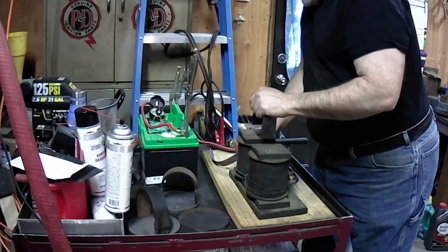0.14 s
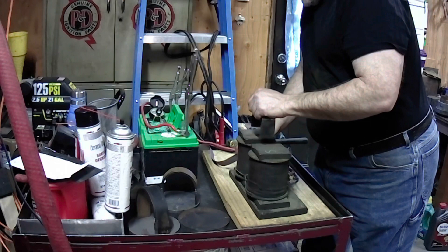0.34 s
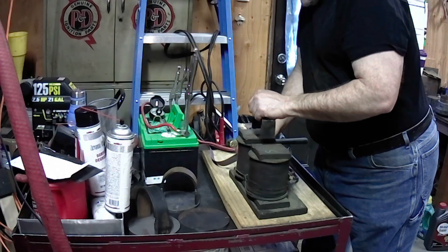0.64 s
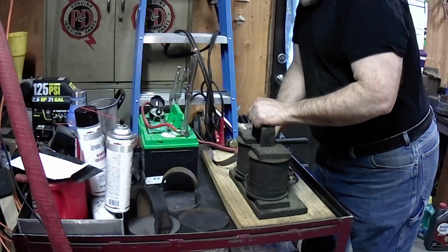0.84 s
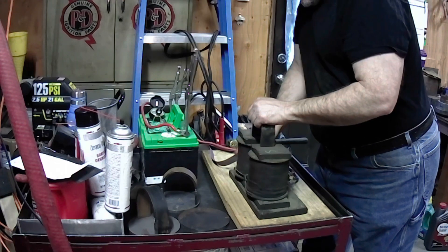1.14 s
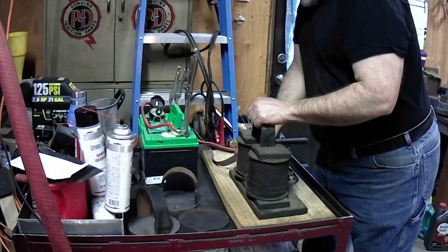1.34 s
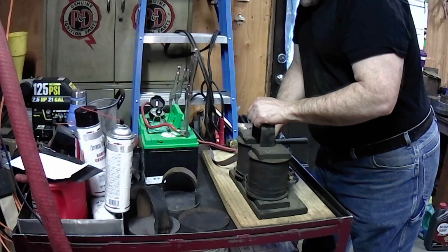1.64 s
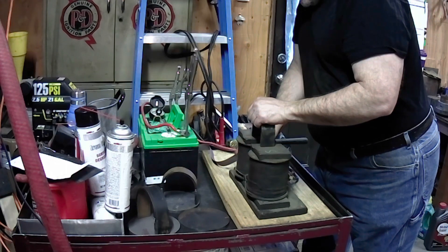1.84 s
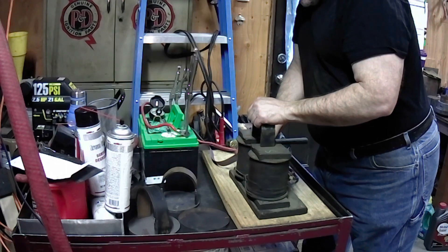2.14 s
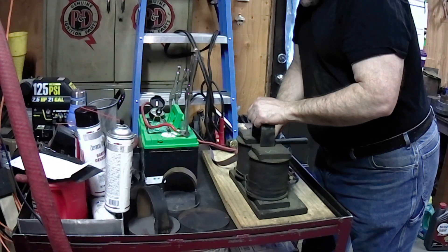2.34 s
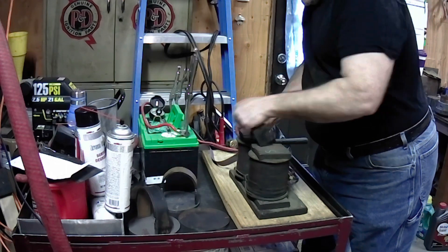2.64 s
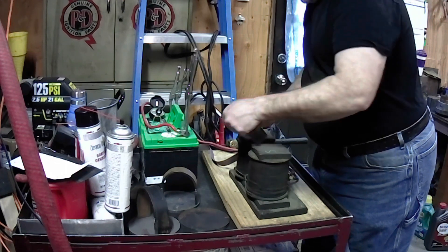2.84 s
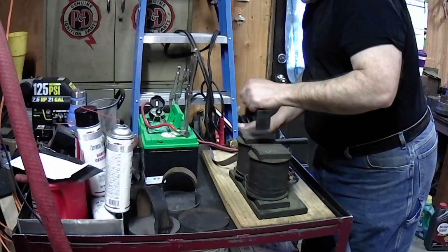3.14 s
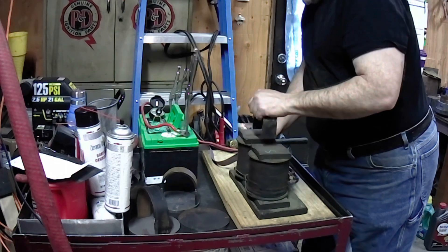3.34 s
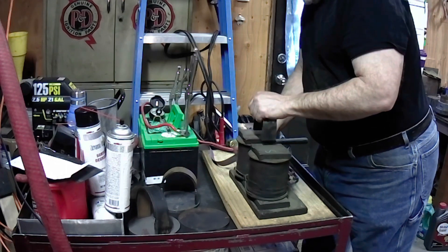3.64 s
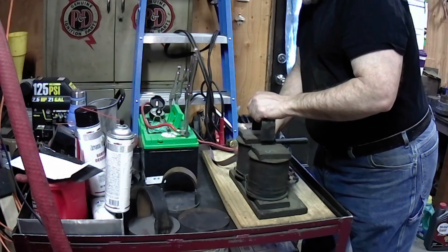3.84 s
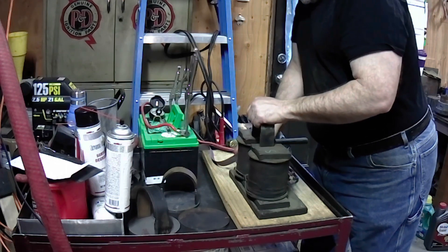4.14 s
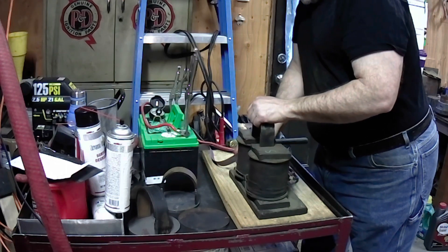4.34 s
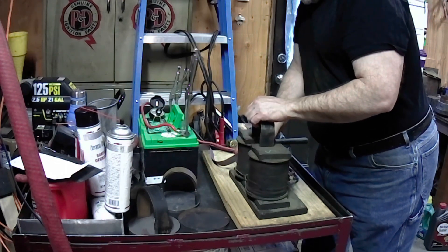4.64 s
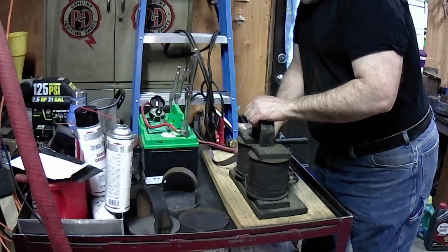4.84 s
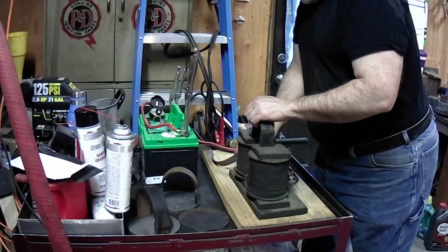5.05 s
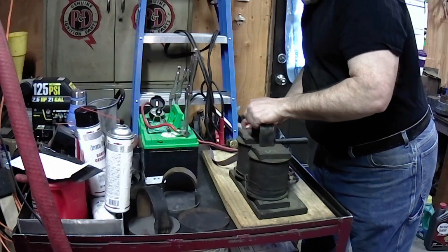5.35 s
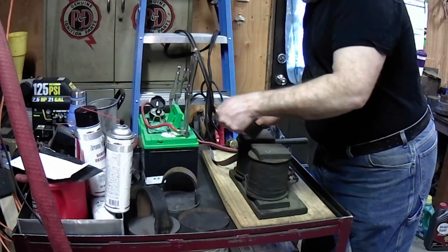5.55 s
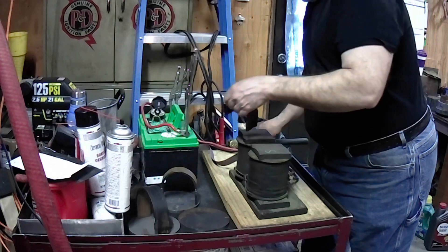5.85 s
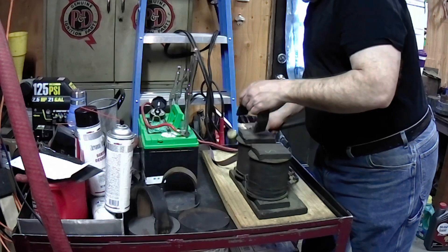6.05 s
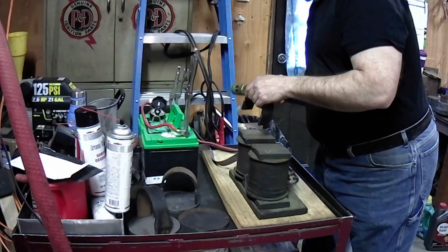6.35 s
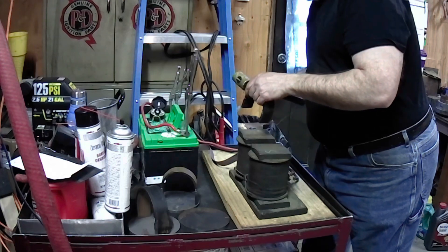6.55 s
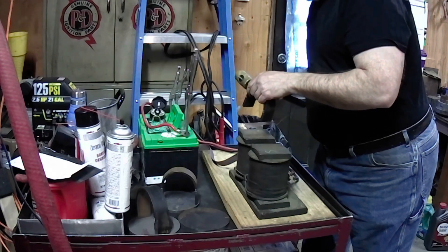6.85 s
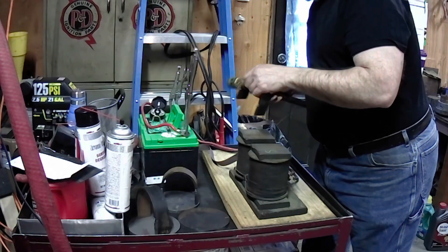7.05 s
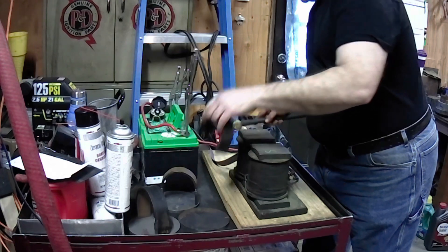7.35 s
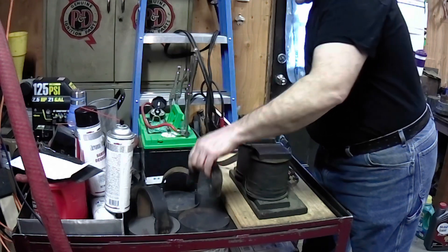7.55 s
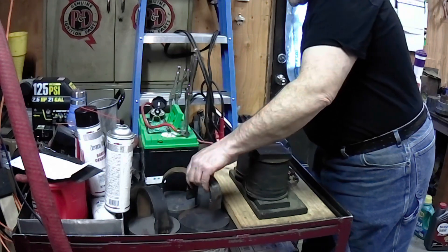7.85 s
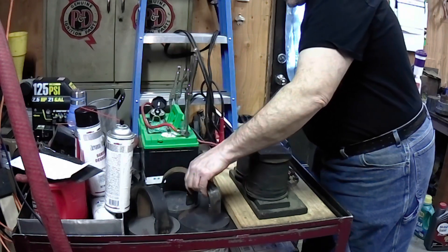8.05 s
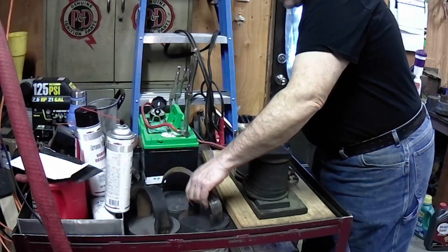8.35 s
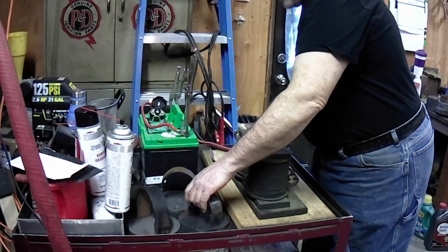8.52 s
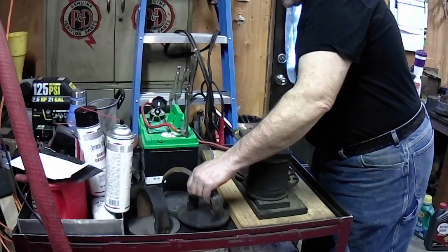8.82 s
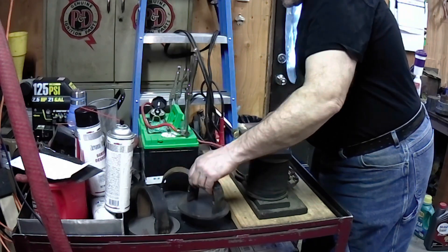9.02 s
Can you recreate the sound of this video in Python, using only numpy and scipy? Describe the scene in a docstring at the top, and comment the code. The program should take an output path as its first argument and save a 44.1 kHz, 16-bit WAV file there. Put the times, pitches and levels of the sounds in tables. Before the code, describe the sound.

In a hard-walled garage, a magnet touches iron poles with light ticks, then snaps home in a very loud, dry clack. It is dragged off with a short scrape and knock, and the snap repeats. After dull cart rattles, a free magnet gives one clear ringing clink; finally one lands on a steel tray with a hard clatter. A small thin microphone hisses and overloads.

```python
"""Horseshoe magnets on iron poles

On a steel cart in a garage, magnets are set on, snap onto and are dragged off a charger's iron poles.
Blows are rattle bursts and damped modes of what is struck, plus the cart; drags are dense clicks.
A magnet held free rings long, another is dropped on the tray; bare walls answer for about half a second.
The small camera microphone has little bass, hisses, clips at full scale and cuts the top.
"""
import sys
import numpy as np
from scipy import signal
from scipy.fft import rfft, irfft
from scipy.io import wavfile
from scipy.ndimage import uniform_filter1d

SR = 44100
rng = np.random.default_rng(int(sys.argv[2]) if len(sys.argv) > 2 else 0)


def digitize_waveform(pressure):
    """Quantize a signal to 16-bit integers and store it at the path in sys.argv[1].

    Rows of a 2-D input are taken as channels; values are limited to [-1, 1].
    """
    field = np.atleast_2d(pressure).T
    bounded = np.clip(field, -1, 1)
    quanta = np.round(bounded * 32767).astype(np.int16)
    wavfile.write(sys.argv[1], SR, quanta)


N = 404838  # samples

# how a body answers: (modes per listed pitch, relative spread of their pitch)
DENSE, PLAIN, CLEAR = (6, 0.02), (1, 0.005), (1, 0)


# magnets snapping home: start_s, level_db
SNAP_TIMES = [(1.024, -5.5), (4.32, -4)]
# magnet clamped to the poles: pitch_hz, level_db, t60_s
CLAMPED_MODES = [(856, 1, 0.021), (1103, -5.5, 0.036), (1670, -13.5, 0.022), (2089, -5, 0.055),
                 (2970, -9.5, 0.034), (3361, -11.5, 0.032), (3940, -6.5, .025), (4096, -1, .035),
                 (4090, -0.5, 0.055), (4600, -1, 0.038), (5510, -15.5, 0.025), (6246, -14.5, 0.084),
                 (7730, -16, 0.02), (8330, -16, 0.09), (10464, -22, 0.052)]


def snaps():
    """Pulled home by its own force, the magnet and poles ring briefly as one loaded casting."""
    return blows(SNAP_TIMES, CLAMPED_MODES, DENSE, rattle_db=-1.0, rattle_s=0.021, rise_s=0.0061,
                 soft_hz=3000, treble_db=0.6, cart_db=-13, size=SR // 4)


# magnets touching the poles: start_s, level_db
KNOCK_TIMES = [(0.905, -37.5), (0.933, -34), (0.979, -42.5), (2.608, -53), (2.646, -42.5), (2.691, -25.5),
               (2.811, -46.5), (3.012, -46.5), (3.044, -43.5), (4.224, -39.5), (4.241, -32.5),
               (5.344, -39.5), (5.368, -31.5), (5.382, -25.5), (5.593, -52)]
# iron poles: pitch_hz, level_db, t60_s
POLE_MODES = [(636, -4, 0.044), (800, -0.5, 0.042), (1055, 0, 0.035), (1270, -1, 0.017), (1616, 3.5, 0.021),
              (2288, 0, .014), (2420, -5, .012), (2760, -9.5, 0.016), (4030, -16, 0.023), (4400, -18, .014),
              (5300, -20, .012)]


def knocks():
    """Softer contacts ring the heavy poles for a few hundredths of a second."""
    return blows(KNOCK_TIMES, POLE_MODES, DENSE, rattle_db=-2.0, rattle_s=0.041, rise_s=0.03,
                 soft_hz=2670, treble_db=-10.5, cart_db=-12, harder=-0.05, shakier=0.2, size=SR // 4)


# magnets half off the poles: start_s, level_db
LIFT_TIMES = [(0.003, -45.5), (0.018, -36.5), (3.094, -47.5), (3.101, -36.5), (5.714, -40), (5.731, -42.5)]
# half-lifted magnet: pitch_hz, level_db, t60_s
LIFTING_MODES = [(628, -6.5, 0.068), (743, -15, 0.1), (967, 0.5, 0.032), (1040, -31, 0.083),
                 (1143, -4.5, 0.035), (1490, -8, 0.045), (1810, -19.5, 0.029), (2830, -17.5, 0.075),
                 (3420, -21, 0.18), (3900, -11, 0.083), (4615, -7.5, 0.048)]


def lifts():
    """A half-lifted magnet is only partly damped by the iron."""
    return blows(LIFT_TIMES, LIFTING_MODES, PLAIN, rattle_db=-6.5, rattle_s=0.027, rise_s=0.0048,
                 soft_hz=2130, treble_db=-16, cart_db=-10.5, size=SR // 3)


# blows on a magnet held free: start_s, level_db
CLINK_TIMES = [(.018, -59.5), (3.1, -60.5), (6.918, -13)]
# free magnet: pitch_hz, level_db, t60_s
FREE_MODES = [(646, -22.5, 1.9), (1860, -20, 0.17), (1792, -22, 0.051), (3419, -20.5, 0.36),
              (3740, -16, 0.139), (3957, -7.5, 0.29), (3934, -3.5, 0.1), (4060, -20.5, 0.17),
              (5370, -21.5, 0.085), (6928, -13.5, 0.13), (6935, -11.5, 0.011), (8000, -38, 0.15),
              (10280, -27.5, 0.062), (10700, -30, 0.053)]


def clinks():
    """With nothing to damp it, a free magnet rings long and clear."""
    return blows(CLINK_TIMES, FREE_MODES, CLEAR, rattle_db=-15.5, rattle_s=0.014, rise_s=0.0031,
                 soft_hz=998, treble_db=-7.5, cart_db=-40.5, harder=0.94, size=SR * 2)


# loose iron touched as a magnet tears free: start_s, level_db
PING_TIMES = [(5.384, -60)]
# loose iron piece: pitch_hz, level_db, t60_s
LOOSE_MODES = [(2068, 0, 1), (2370, -6, 0.45)]


def pings():
    """A loose iron piece pings faintly on two clear modes."""
    return blows(PING_TIMES, LOOSE_MODES, CLEAR, rattle_db=-21, rattle_s=0.02, rise_s=0.0092,
                 soft_hz=4000, treble_db=0, cart_db=-40, size=SR)


# magnet landing on the tray: start_s, level_db
DROP_TIMES = [(8.594, -9), (8.946, -50.5)]
# tray: pitch_hz, level_db, t60_s
TRAY_MODES = [(1070, -10, 0.012), (1334, -4.5, 0.0087), (1620, -10.5, 0.011), (2040, -3, 0.031),
              (3010, 10, 0.0093), (4000, -9, .008), (4700, -5, .008), (6000, -21.5, .008),
              (7600, -17, .008)]


def drops():
    """Rattle outweighs the short modes of the struck tray."""
    return blows(DROP_TIMES, TRAY_MODES, DENSE, rattle_db=16.5, rattle_s=0.042, rise_s=0.0087,
                 soft_hz=2930, treble_db=-1.2, cart_db=-2, shakier=0.21, size=SR // 4)


# jolts of the cart's wheels: start_s, level_db
JOLT_TIMES = [(6.03, -51.5), (6.107, -47.5), (6.128, -37), (6.152, -30), (6.169, -31.5), (6.18, -30.5),
              (6.193, -27.5), (6.217, -42.5), (8.598, -19.5)]
# wheels: pitch_hz, level_db, t60_s
WHEEL_MODES = [(202.5, -5, 0.089), (268, -4, 0.049), (365, 3.5, 0.025), (518, -14.5, 0.086),
               (668, -8, 0.038), (1576, -8.5, 0.024), (2120, -10, 0.015), (2340, -5, 0.018),
               (3480, 7, 0.0042)]


def jolts():
    """Each jolt rings the wheels low and dull."""
    return blows(JOLT_TIMES, WHEEL_MODES, DENSE, rattle_db=-5.5, rattle_s=0.046, rise_s=0.012,
                 soft_hz=1570, treble_db=-9.5, cart_db=-12, harder=0.27, size=SR // 4)


# steel cart under everything: pitch_hz, level_db, t60_s
CART_MODES = [(267, -7.5, 0.064), (340, -12, 0.093), (418, 1, 0.077), (565, 0, 0.065), (770.6, -6, 0.14)]
# short rattle of the meeting faces: pitch_hz, level_db (per Hz)
RATTLE_SPECTRUM = [(60, -32), (200, -20), (500, 1.5), (1000, -0.5), (2500, -2.5), (5000, -4.5), (9000, -20),
                   (14000, -34.5)]
FIRM_DB = -30  # level of a firm blow


def blows(events, modes, kind, rattle_db, rattle_s, rise_s, soft_hz, treble_db, cart_db, size,
          harder=0, shakier=0):
    """A blow excites modes, rattle and cart.

    Per dB above a firm blow the treble gains `harder` dB and the cart's share loses `shakier` dB.
    """
    out = np.zeros(N + SR * 3)  # room for the last ring
    t = np.arange(size) / SR
    # two equal filters in a row on each side of soft_hz
    low = np.tile(signal.butter(2, soft_hz, "low", fs=SR, output="sos"), (2, 1))
    high = np.tile(signal.butter(2, soft_hz, "high", fs=SR, output="sos"), (2, 1))
    rise = 1 - fade(t, rise_s)
    for start_s, level_db in events:
        over_db = level_db - FIRM_DB
        burst = rng.standard_normal(size) * fade(t, rattle_s) * rise
        rattle = colour(even(burst, 200), RATTLE_SPECTRUM)
        hit = unit(ring(modes, t, kind) * rise) + undb(rattle_db) * unit(rattle)
        treble = undb(treble_db + harder * over_db) * signal.sosfilt(high, hit)
        hit = unit(signal.sosfilt(low, hit) + treble)
        cart = unit(ring(CART_MODES, t, PLAIN) * rise * (1 - t / t[-1]))
        hit = hit + undb(cart_db - shakier * over_db) * cart
        k = int(start_s * SR)
        out[k:k + size] += undb(level_db) * hit
    return out[:N]


# metal dragged or faintly shuffled over the poles, dying as a magnet settles, swelling as one tears free:
# start_s, end_s, start_level_db, end_level_db, cart_share_db
DRAG_SPANS = [(0.098, 0.75, -76, -80, 3), (0.9, 1.012, -52.5, -63.5, -7), (2.644, 2.69, -51.5, -29.5, -26),
              (2.7, 2.916, -49.5, -68, 5), (2.924, 3.1, -53, -83, 12), (4.222, 4.305, -55, -61.5, -7),
              (5.325, 5.378, -57, -41, -24), (5.68, 5.73, -56, -50.5, -0.5), (5.9, 6.09, -78.5, -76, 11.5),
              (6.597, 6.91, -80, -71.5, 6.5)]
DRAG_EDGE_S = 0.0049  # a drag bites and lets go within this time


def drags(rate=900, spread_db=1.0, grit_db=-5):
    """Stick-slip: `rate` uneven clicks a second into poles and cart, also heard directly as grit."""
    t, now = np.arange(SR // 4) / SR, np.arange(N) / SR
    press, shake = np.zeros(N), np.zeros(N)
    for start_s, end_s, first_db, last_db, cart_db in DRAG_SPANS:
        grip = np.clip(np.minimum(now - start_s, end_s - now) / DRAG_EDGE_S, 0, 1)
        force = grip * undb(np.interp(now, [start_s, end_s], [first_db, last_db]))
        press += force
        shake += force * undb(cart_db)
    slips = rng.random(N) < rate / SR
    strength = undb(spread_db * rng.exponential(size=N))
    clicks = slips * strength * np.sign(rng.standard_normal(N))
    grit = colour(clicks, RATTLE_SPECTRUM)
    out = undb(grit_db) * press * grit / np.std(grit)
    for weight, modes in ((press, POLE_MODES), (shake, CART_MODES)):
        body = ring(modes, t, DENSE)
        body = body / np.sqrt(np.sum(body ** 2))
        out = out + signal.fftconvolve(weight * clicks / np.std(clicks), body)[:N]
    return out


# how long the bare walls answer: pitch_hz, t60_s
GARAGE_DECAY = [(100, 0.53), (260, 0.41), (700, 0.54), (1840, .49), (4850, 0.43), (11000, 0.13)]


def garage(dry, wet_db=0.5, gap_s=0.003, early_db=4.0, early_s=0.15):
    """Direct sound, strong near echoes, then a diffuse tail whose top treble dies first."""
    t = np.arange(int(0.9 * SR)) / SR
    noise = rfft(rng.standard_normal(len(t)))
    f = np.arange(len(t) // 2 + 1) * SR / len(t)
    tail = 0
    for hz in 60 * 2 ** np.arange(0, 8.5, 0.5):  # overlapping half-octave bands
        band = np.clip(1 - 2 * np.abs(np.log2(np.maximum(f, 1) / hz)), 0, 1)
        tail = tail + irfft(noise * band, len(t)) * fade(t, on_log(GARAGE_DECAY, hz))
    early = 1 + undb(early_db) * fade(t, early_s)
    arrival = np.clip(t / gap_s - 1, 0, 1)  # silent for gap_s, full after twice that
    tail = even(tail * early * arrival, 40)
    return dry + undb(wet_db) * signal.fftconvolve(dry, tail / np.sqrt(np.sum(tail ** 2)))[:N]


# microphone noise and far room air: pitch_hz, level_db (per Hz, relative)
HISS_SPECTRUM = [(12, -57.5), (20, -28), (112, -4.5), (214, -3), (238, -3.5), (329, -3.5), (387, -3),
                 (1050, -10), (1660, -12.5), (4610, -15.5), (5000, -12.5), (5420, -15.5), (12500, -17),
                 (16200, -43), (22000, -120)]
HISS_DB = -64
WHINE_HZ, WHINE_DB = 5000, -85


def hiss():
    """Coloured noise for microphone and far room air, with a thin wavering whine."""
    air = colour(rng.standard_normal(N), HISS_SPECTRUM)
    sway_hz = 1500 * uniform_filter1d(rng.standard_normal(N), SR // 8)  # averaging leaves about 20 Hz
    whine = np.sin(2 * np.pi * np.cumsum(WHINE_HZ + sway_hz) / SR)
    return undb(HISS_DB) * air / np.std(air) + undb(WHINE_DB) * whine


SCATTER_DB = 2  # chance spread of mode levels


def ring(modes, t, kind):
    """Damped sines, in clusters for loaded castings; chance sets sign, share and exact pitch."""
    count, detune = kind
    f, db, t60 = np.repeat(np.transpose(modes), count, axis=1)[:, :, None]
    luck = rng.standard_normal(size=(3, len(f), 1))
    gain = undb(db)  # clear bodies keep the listed levels
    if detune:
        gain = np.sign(luck[0]) * undb(db + SCATTER_DB * luck[1])
    pitch_hz = f * (1 + detune * luck[2])
    return np.sum(gain * np.sin(2 * np.pi * pitch_hz * t) * fade(t, t60), axis=0)


def fade(t, t60):
    """Falls 60 dB in t60 seconds."""
    return np.exp(-np.log(1000) * t / t60)


def undb(db):
    """dB to gain."""
    return 10 ** (np.asarray(db) / 20)


def unit(x, count=441):
    """RMS level 1 over the first 10 ms."""
    return x / np.sqrt(np.mean(x[:count] ** 2))


def on_log(table, hz):
    """A (pitch_hz, value) table read on a log-frequency axis."""
    f, v = np.transpose(table)
    return np.interp(np.log(np.maximum(hz, 1)), np.log(f), v)


def colour(x, table, size=2048):
    """Causal filter with the given spectrum, from the folded cepstrum of its log gain."""
    gain = undb(on_log(table, np.arange(size // 2 + 1) * SR / size))
    cepstrum = irfft(np.log(gain))
    cepstrum[1:size // 2] *= 2
    cepstrum[size // 2 + 1:] = 0
    return signal.fftconvolve(x, irfft(np.exp(rfft(cepstrum))))[:len(x)]


def even(x, width_hz):
    """Many unrelated contacts or echoes sum to an even spectrum: level out lumps wider than width_hz."""
    power = uniform_filter1d(np.abs(rfft(x)) ** 2, size=int(width_hz * len(x) / SR) + 1)
    hz = np.arange(len(power)) * SR / len(x) + 1
    return colour(x, np.transpose([hz, -10 * np.log10(power)]))


BASS_CUT_HZ, TOP_HZ = 280, 12750


def scene():
    """All metal sounds share the garage; the hiss lies on top."""
    metal = snaps() + knocks() + lifts() + clinks() + pings() + drops() + jolts() + drags()
    # the small capsule hears little bass
    bass_cut = signal.butter(2, BASS_CUT_HZ, "high", fs=SR, output="sos")
    room = signal.sosfilt(bass_cut, garage(metal))
    return (room + hiss())[None]


def record(dry):
    """The microphone's electronics clip at full scale, then a steep low-pass cuts the top."""
    top_cut = signal.ellip(8, 0.2, 60, TOP_HZ, fs=SR, output="sos")
    return signal.sosfilt(top_cut, np.clip(dry, -1, 1))


dry = scene()
out = record(dry)
digitize_waveform(out)
```